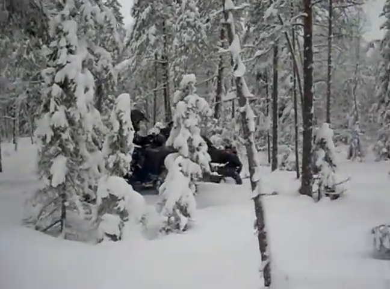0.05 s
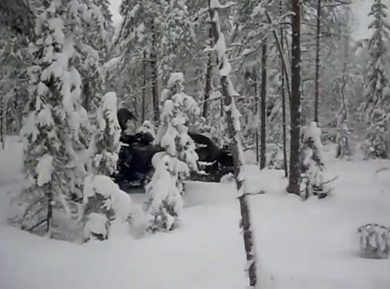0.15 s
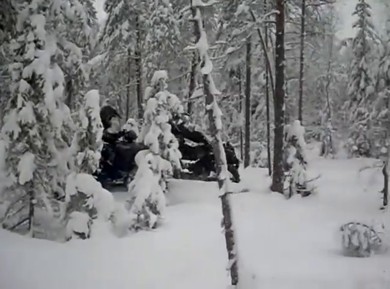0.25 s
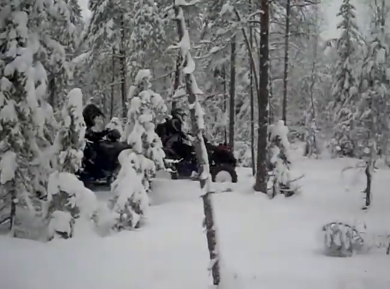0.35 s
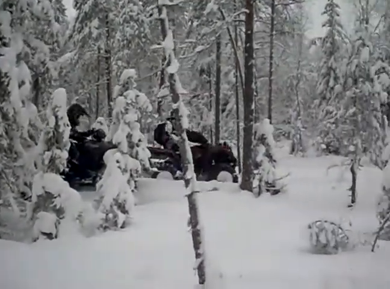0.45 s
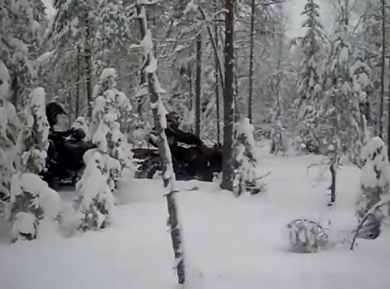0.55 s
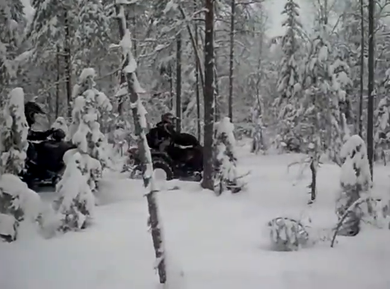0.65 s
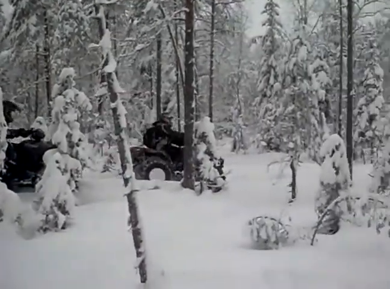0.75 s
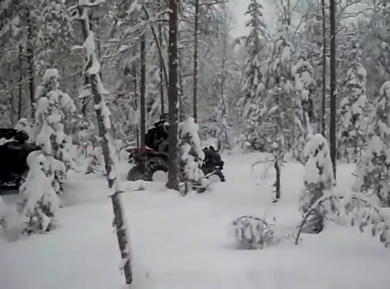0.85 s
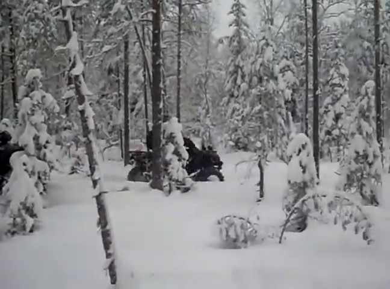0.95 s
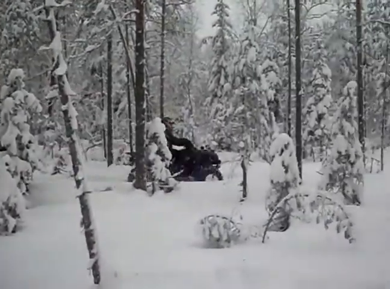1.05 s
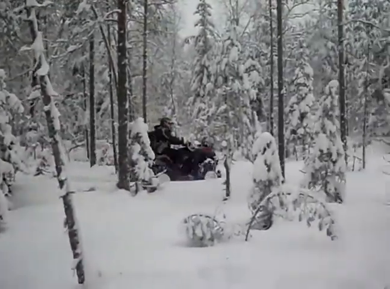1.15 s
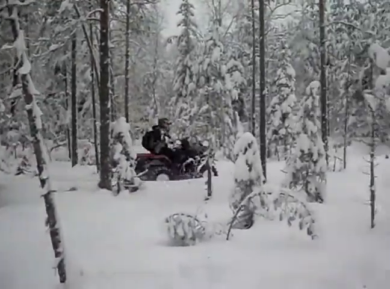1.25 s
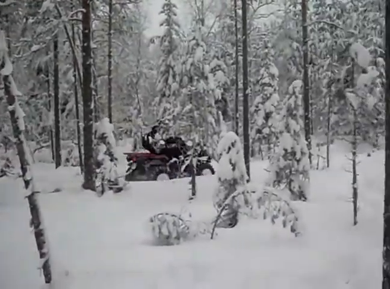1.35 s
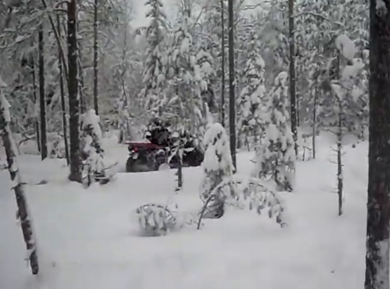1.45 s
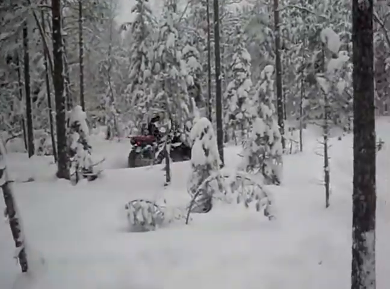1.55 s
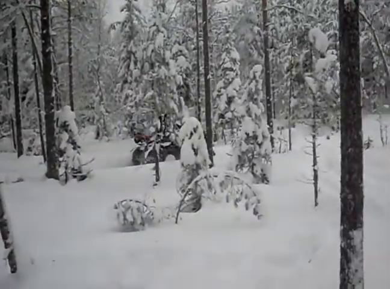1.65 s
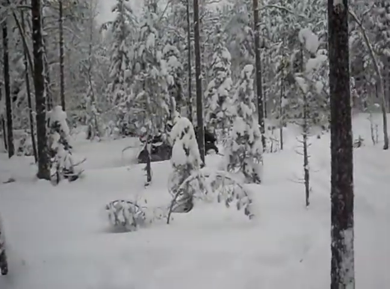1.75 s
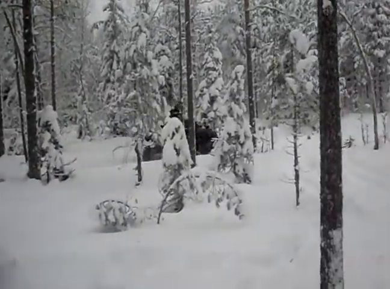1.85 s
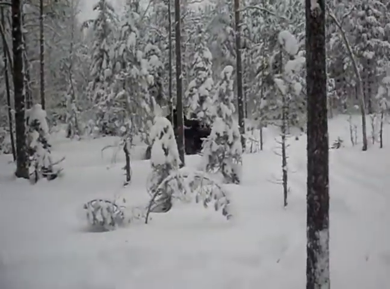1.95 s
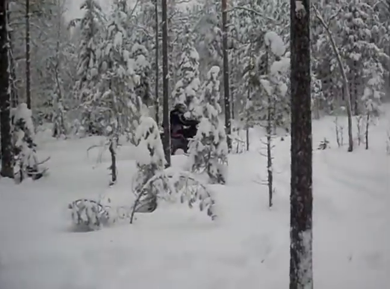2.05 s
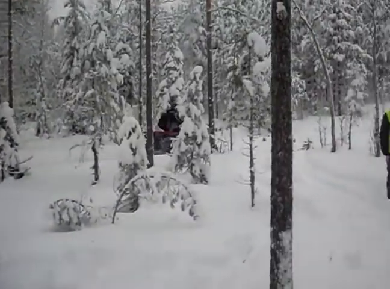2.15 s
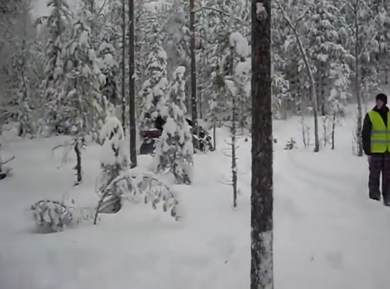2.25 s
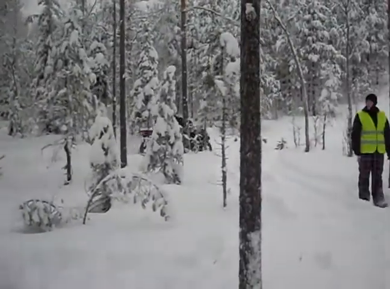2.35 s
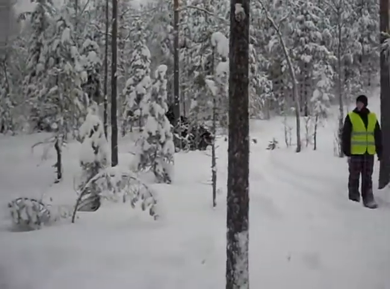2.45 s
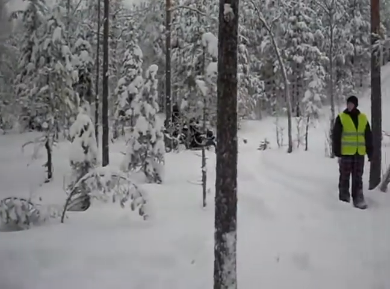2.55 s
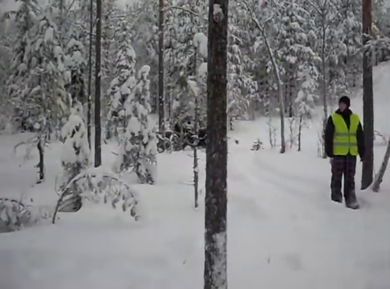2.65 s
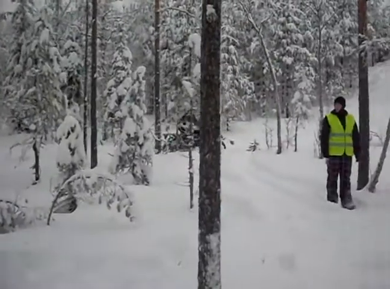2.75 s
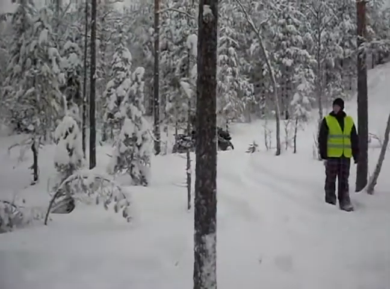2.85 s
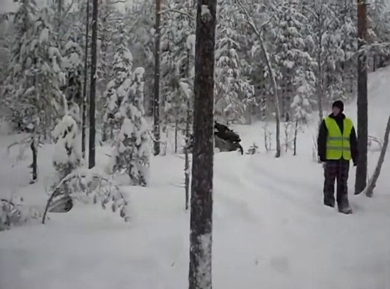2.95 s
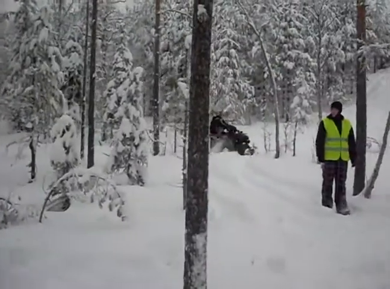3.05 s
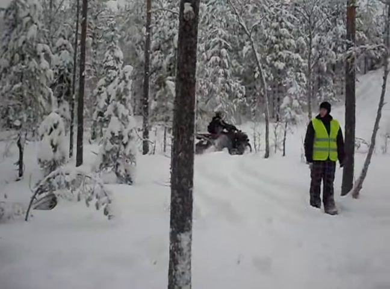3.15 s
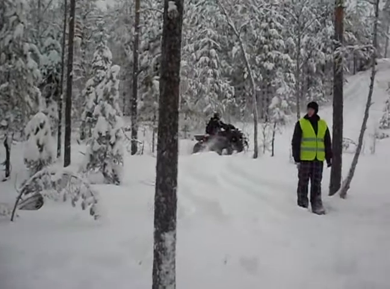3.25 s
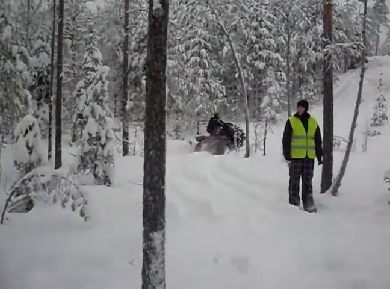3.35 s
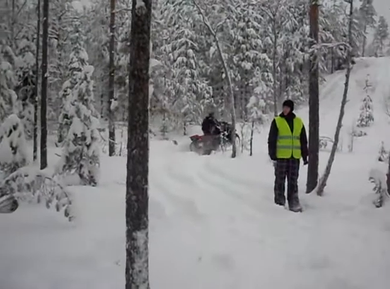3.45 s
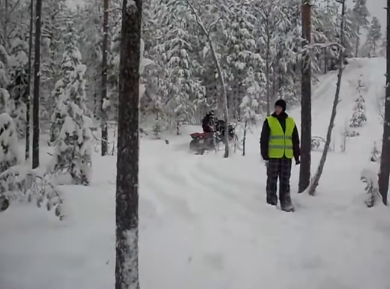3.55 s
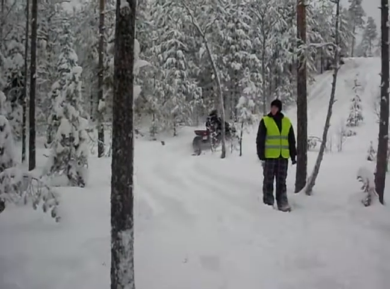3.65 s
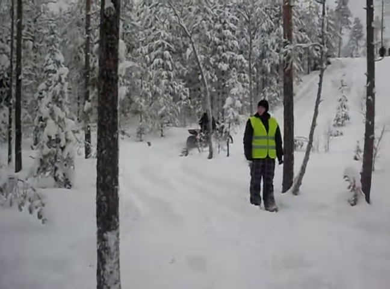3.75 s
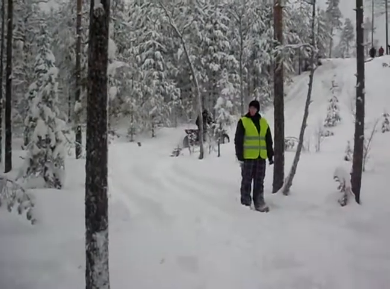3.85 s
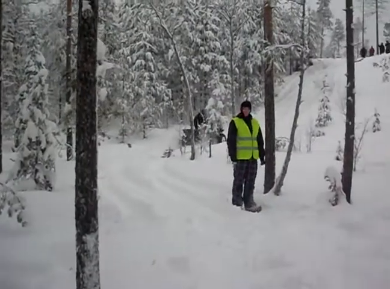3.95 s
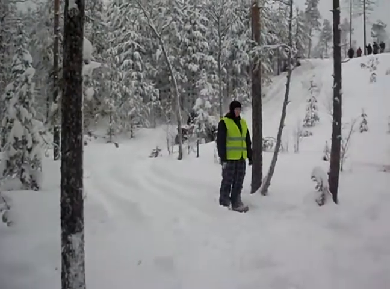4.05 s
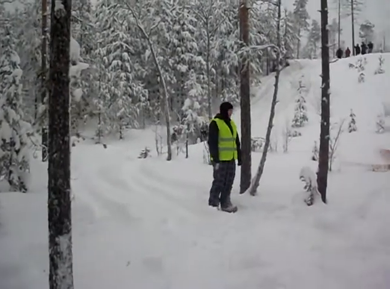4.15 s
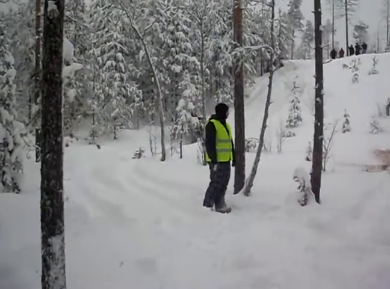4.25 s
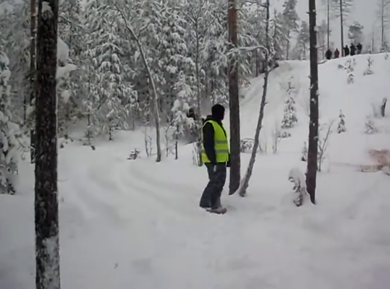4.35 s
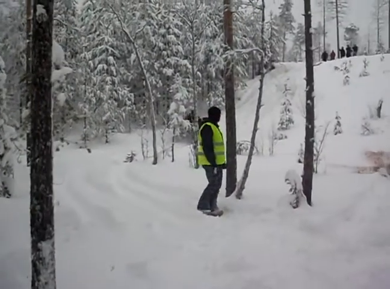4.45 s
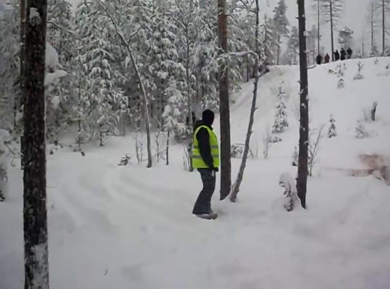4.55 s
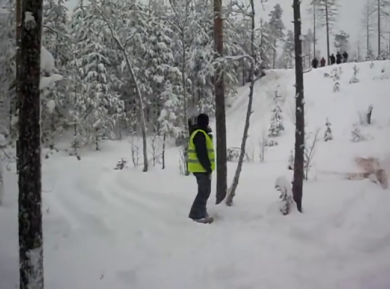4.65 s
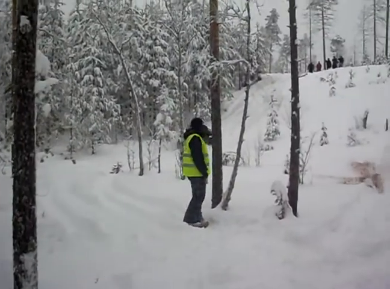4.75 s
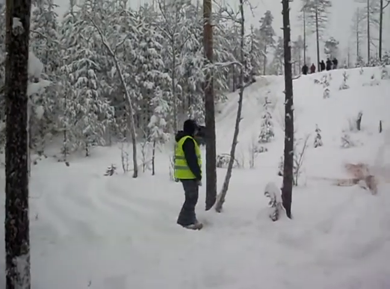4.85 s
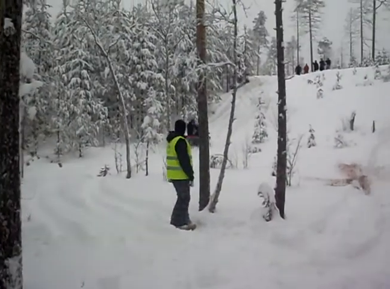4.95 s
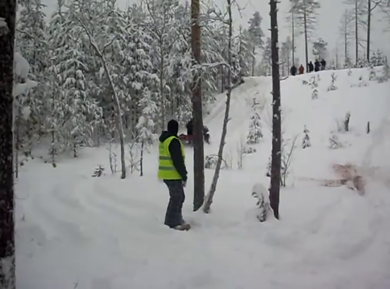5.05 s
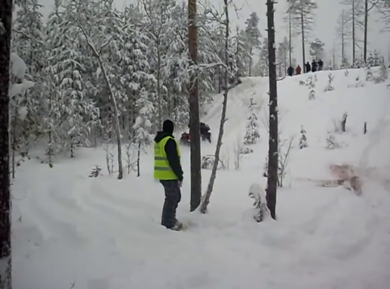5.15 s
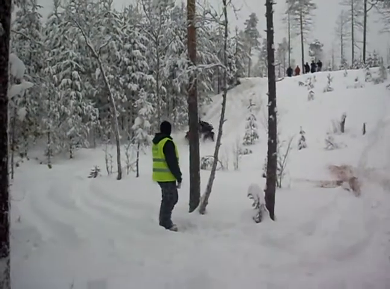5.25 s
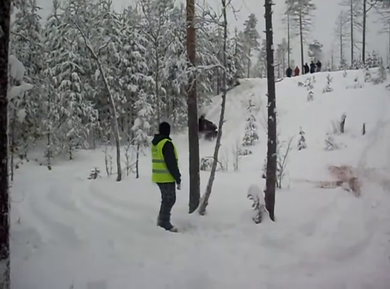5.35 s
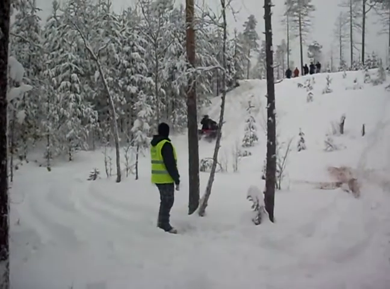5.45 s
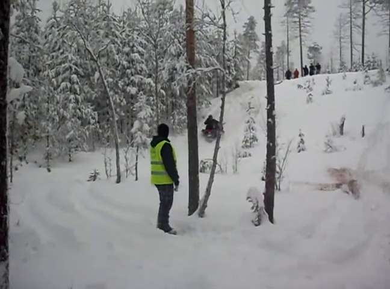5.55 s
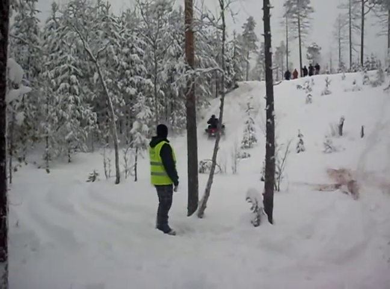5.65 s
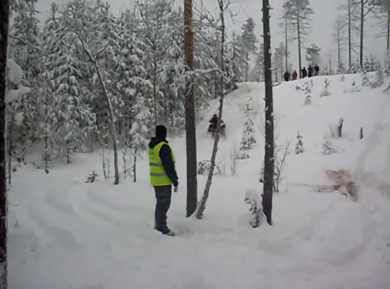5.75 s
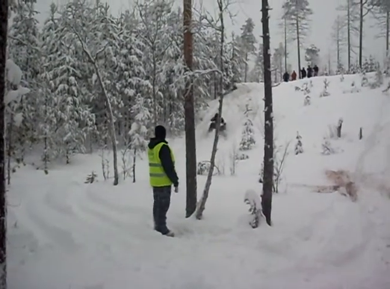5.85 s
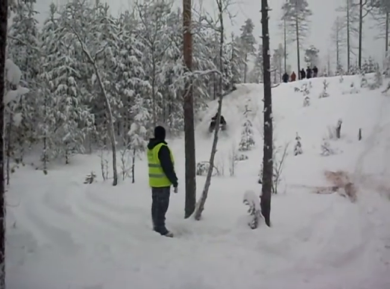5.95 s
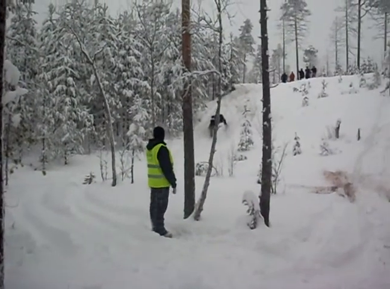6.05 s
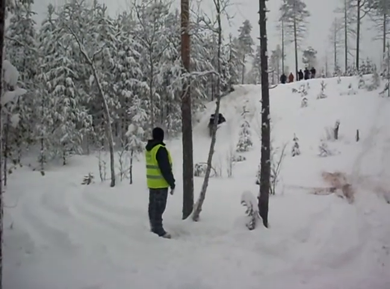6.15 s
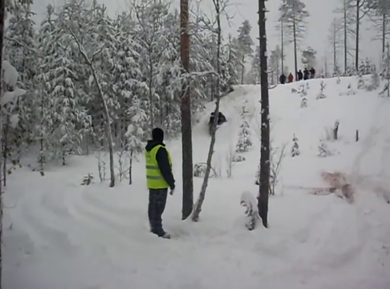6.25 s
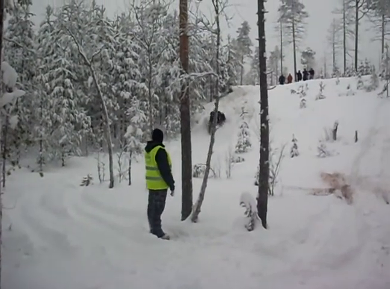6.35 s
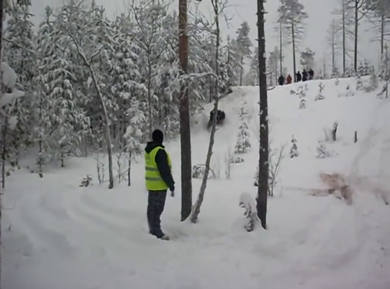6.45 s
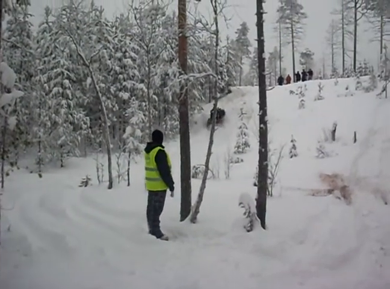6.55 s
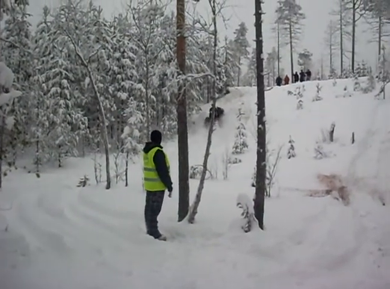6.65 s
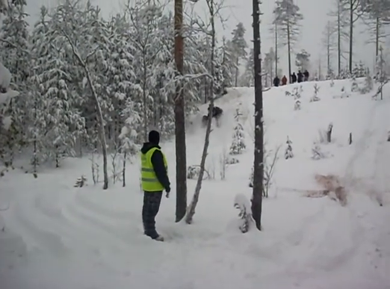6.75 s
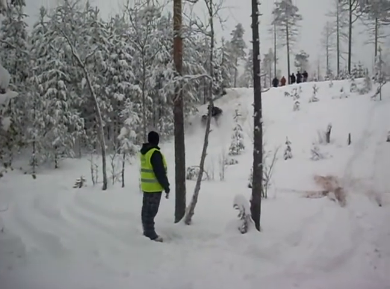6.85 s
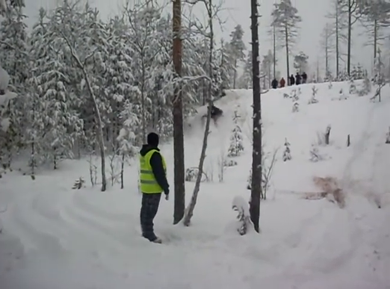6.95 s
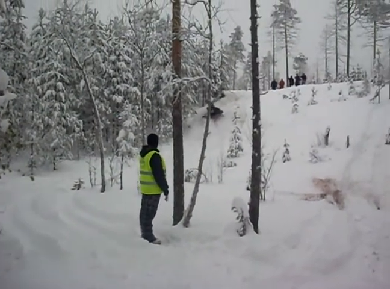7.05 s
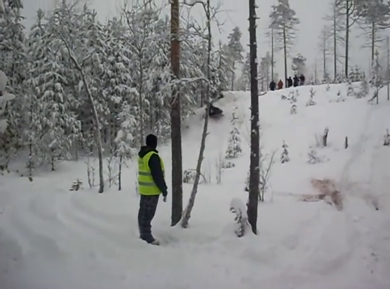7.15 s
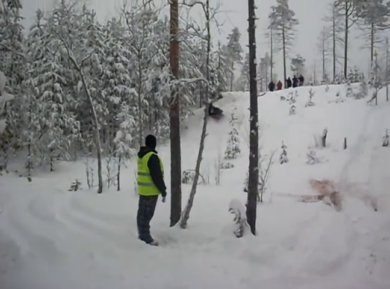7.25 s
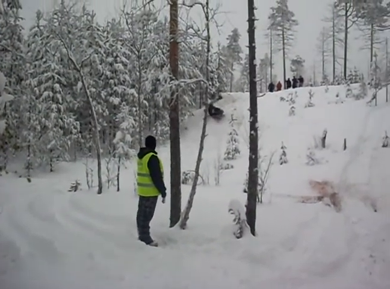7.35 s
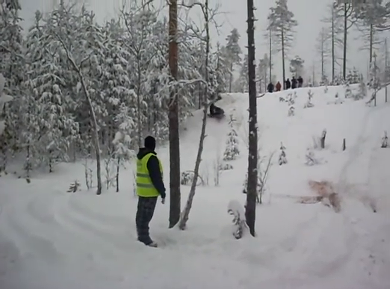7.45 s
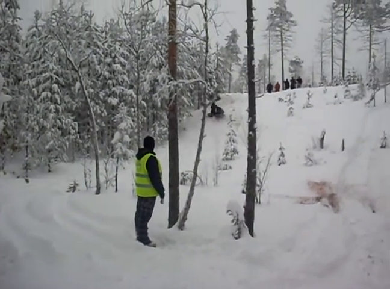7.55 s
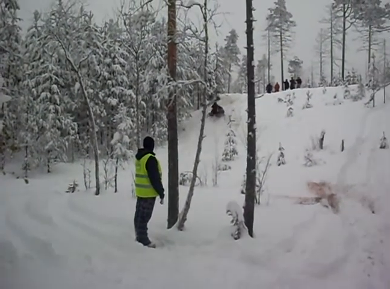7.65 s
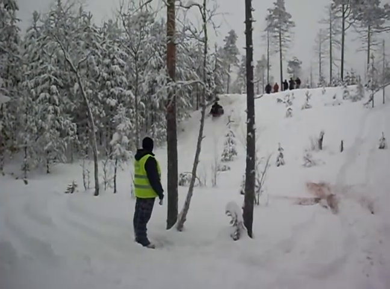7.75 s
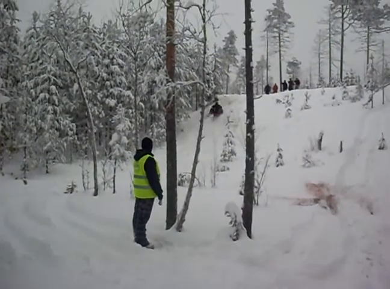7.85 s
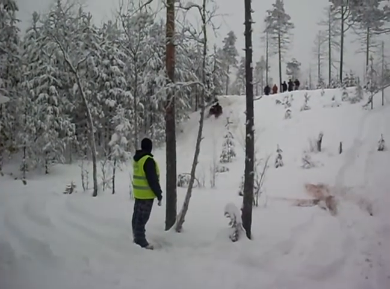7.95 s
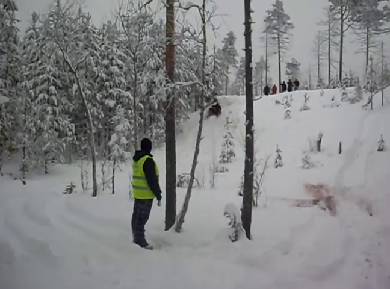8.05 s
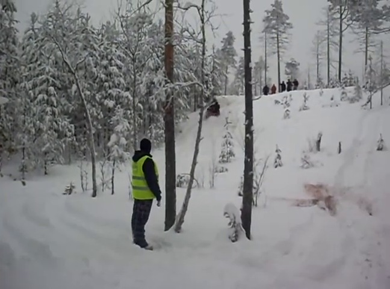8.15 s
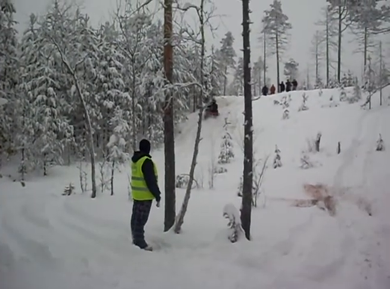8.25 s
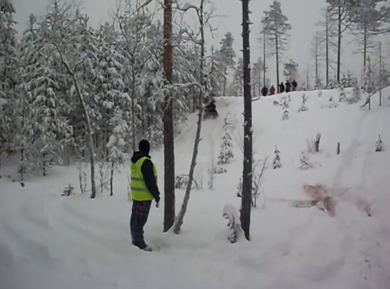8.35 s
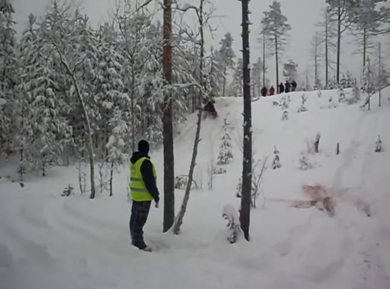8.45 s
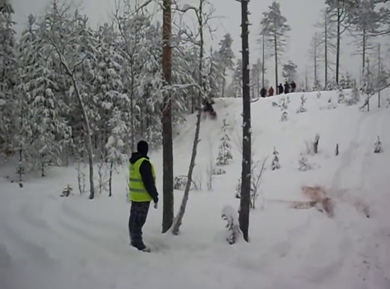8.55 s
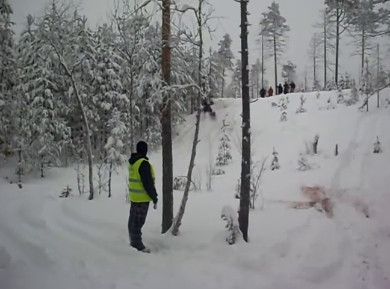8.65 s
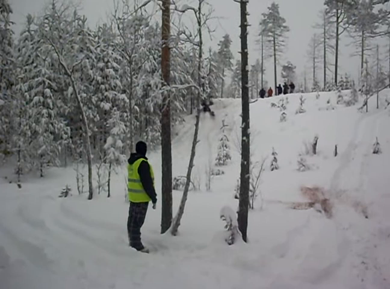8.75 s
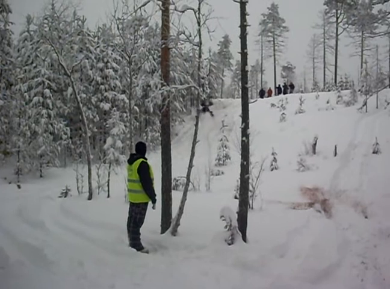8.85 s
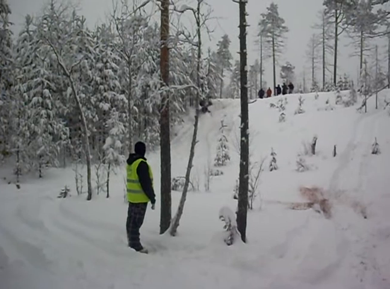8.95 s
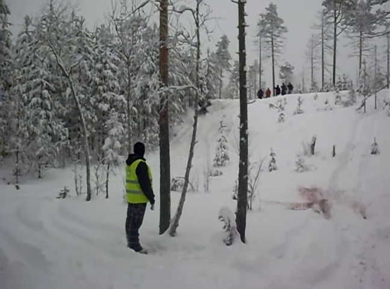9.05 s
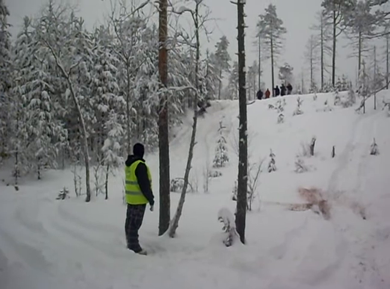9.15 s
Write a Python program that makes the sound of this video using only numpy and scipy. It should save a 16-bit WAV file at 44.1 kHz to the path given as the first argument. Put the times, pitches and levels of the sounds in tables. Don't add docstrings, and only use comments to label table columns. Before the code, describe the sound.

Outdoors in a snowy forest, a quad bike passes at part throttle, low and muffled behind trees, with distant engines rumbling beyond. It labours in deep snow, then about halfway through the throttle snaps open and the exhaust becomes a loud, rough, sustained bark with rasp and small cracks until the end. A small camera microphone gives a dull top end and a short soft echo off the trees.

```python
import sys
import numpy as np
from scipy import signal
from scipy.fft import rfft, irfft, next_fast_len
from scipy.io import wavfile
from scipy.ndimage import uniform_filter1d, map_coordinates

SR = 44100
rng = np.random.default_rng(int(sys.argv[2]) if len(sys.argv) > 2 else 0)


def pcm_store(signal):
    levels = np.round(np.clip(np.atleast_2d(signal), -1, 1) * 32767)
    wavfile.write(sys.argv[1], SR, levels.astype(np.int16).T)


def amplitude_ratio(level_db):
    exponent = np.asarray(level_db, float) / 20
    return 10 ** exponent


N = 406150


def unit(x):
    return x / np.sqrt(np.mean(x ** 2) + 1e-20)


def steady(x):
    power = uniform_filter1d(uniform_filter1d(x ** 2, size=4000), size=4000)
    return x / np.sqrt(np.abs(power) + 1e-20)


def seconds():
    return np.arange(N) / SR


def along(points, hz):
    f, v = np.transpose(points)
    return np.interp(np.log(hz + 1), np.log(f + 1), v)


def curves(rows, s=None):
    t, *columns = np.transpose(rows)
    at = seconds() if s is None else s
    return [np.interp(at, t, column) for column in columns]


def humps(when, size, width_s, s):
    return sum(a * np.exp(-.5 * ((s - t) / width_s) ** 2) for t, a in zip(when, size))


def filtered(x, response):
    m = next_fast_len(N + SR // 2)
    return irfft(rfft(x, m) * response(np.fft.rfftfreq(m, 1 / SR)), m)[:N]


def resonance(f, centre_hz, width_hz):
    return 1j * f * width_hz / (centre_hz ** 2 - f * f + 1j * f * width_hz)


def causal(spectrum):
    def response(hz):
        cepstrum = irfft(np.log(np.maximum(amplitude_ratio(along(spectrum, hz)), 1e-6)))
        half = len(cepstrum) // 2
        cepstrum[1:half] *= 2
        cepstrum[half + 1:] = 0
        return np.exp(rfft(cepstrum))
    return response


def pulses(s, size):
    keep = (s >= 0) & (s < (N - 1) / SR)
    return np.bincount(np.round(s[keep] * SR).astype(int), size[keep], N)


def bursts(s, size, decay_s):
    envelope = signal.lfilter([1], [1, -np.exp(-1 / (decay_s * SR))], pulses(s, size))
    return envelope * rng.standard_normal(N)


# (frequency [Hz], level [dB per Hz])
DISTANT = [(15, -36), (25, -16.5), (102, 0), (253, -8.5), (328, -10.5), (383, -8), (581, -8), (645, -9.5),
           (836, -4.5), (2250, -10), (3500, -16.5), (9890, -28.5), (12500, -37), (16200, -85),
           (22000, -120)]


def distant():
    swell_db = map_coordinates(rng.standard_normal(40), [np.arange(N) * 3 / SR])
    noise = filtered(rng.standard_normal(N), lambda f: amplitude_ratio(along(DISTANT, f)))
    return amplitude_ratio(-43.5 + swell_db) * unit(noise)


# (frequency [Hz], t60 [s])
TREES = [(200, 0.072), (1000, 1), (8000, 0.011)]


def trees(x):
    out, step = np.zeros(N + SR), SR // 4
    for start in range(-step, N, step):
        hz, t, z = signal.stft(rng.standard_normal(SR // 3), SR, nperseg=256)
        decay = amplitude_ratio(-60 * t / along(TREES, hz)[:, None])
        tail = signal.istft(z * decay, SR, nperseg=256)[1]
        at = np.arange(max(start, 0), min(start + 2 * step, N))
        fade = np.sin(np.pi * (at - start) / (2 * step)) ** 2
        echo = signal.fftconvolve(x[at] * fade, tail / np.linalg.norm(tail))
        out[at[0]:at[0] + len(echo)] += echo
    return out[:N]


# (time [s], first notch [Hz], share [0-1])
BOUNCE = [(0, 1190, 0), (.6, 1300, 0), (4.4, 5260, 0.12), (4.9, 4700, 0.5), (5.3, 4300, 0.76),
          (5.5, 3000, 0.49), (6, 2270, 0.02), (6.6, 2040, 0.6), (7, 1580, 0.44), (7.6, 1360, 0.3),
          (8.6, 1060, 0.34), (9.21, 1130, 0.22)]


def snow(x, gain=1):
    notch_hz, share = curves(BOUNCE)
    dull = filtered(x, lambda f: 1 / (1 + (f / 5200) ** 4))
    bounce = np.interp(np.arange(N) - SR / notch_hz, np.arange(N), dull)
    return steady(x - np.clip(gain * share, 0, 1) * bounce)


# (time [s], throttle [0-1], load of deep snow [0-1])
RIDING = [
    (0, 0, 0),
    (2, 0, 0),
    (3, 0, .9),
    (4.38, .1, 1),
    (4.44, .6, 1),
    (4.7, .9, 1),
    (5, 1, 1),
]
# (rear over front [dB], front pipe echo [0-1], silencer echo [0-1], roughness [0-1])
ROLLING = (-2, .68, .5, .09)
DIGGING = (-.5, .83, .2, .15)
FLAT_OUT = (6, .46, .07, .1)


def riding(s=None):
    throttle, load = curves(RIDING, s)
    mix = []
    for rolling, digging, flat_out, power in zip(ROLLING, DIGGING, FLAT_OUT, (3, 1, 1, 1)):
        opened = throttle ** power
        mix.append((1 - opened) * (rolling + load * (digging - rolling)) + opened * flat_out)
    return [throttle] + mix


# (time [s], rate [firing pairs/s])
SPEED = [(0.0, 39.14), (0.12, 41.22), (0.55, 42.82), (0.8, 39.45), (1.1, 41.76), (1.6, 39.55), (2.3, 39.85),
         (2.75, 42.05), (3.5, 42.72), (4.38, 44.15), (4.78, 56.92), (5.7, 56.37), (6.4, 55.48),
         (6.95, 57.13), (7.8, 55.18), (8.5, 55.41), (9.21, 55.04)]
# (time [s], change [firing pairs/s])
RUTS = [(0.26, -1.25), (0.43, -1.21), (1.12, -1.13), (3.05, -1.19), (3.41, 1.48), (3.67, 1.72),
        (3.76, -1.53), (3.91, -2.1), (4.23, -2.03), (4.92, -1.8), (5.08, -1.32), (5.36, -1.28),
        (5.45, -0.99), (5.56, 0.7), (5.65, 1.81), (5.76, 1.14), (5.85, -1.41), (6.38, -1.12), (6.59, -1.74),
        (7.13, -2.03), (7.22, -1.71), (7.42, 1.66), (7.84, -2.41), (8.31, -1.18), (8.45, 1.48),
        (8.53, -2.3), (8.59, -3.86), (8.65, -2.68), (8.95, -1.75), (9.05, -2.04)]
RUT_S = .03
CLUTCH_S, FLARE_S, FLARE_HZ = 4.53, .04, 1.3


def speed():
    t = seconds()
    clutch = humps([CLUTCH_S - FLARE_S, CLUTCH_S + FLARE_S], [FLARE_HZ, -FLARE_HZ], RUT_S, t)
    return curves(SPEED)[0] + humps(*np.transpose(RUTS), RUT_S, t) + clutch


def turns():
    return np.cumsum(speed()) / SR - .52


PITCHING_S, PITCHING_RATE = .00012, 16
EARLY, EARLY_LOAD, EARLY_THROTTLE = .317, .015, .023
SNAP_S, SNAP_LASTS_S, SNAP_DB = 4.9, 0.045, -2


def firings():
    pairs = turns()
    rear = np.interp(np.arange(int(pairs[-1]) + 1), pairs, seconds()) - .0003
    rocking = map_coordinates(rng.standard_normal(200), [np.abs(rear) * PITCHING_RATE])
    rear = rear + PITCHING_S * rocking
    throttle, lead_db = riding(rear)[:2]
    lead_db = lead_db + humps([SNAP_S], [SNAP_DB], SNAP_LASTS_S, rear)
    load = curves(RIDING, rear)[1]
    early = EARLY - EARLY_THROTTLE * throttle - EARLY_LOAD * (1 - throttle) * load
    front = rear - early / np.interp(rear, seconds(), speed())
    chance = rng.standard_normal((2 * len(rear), 2))
    s = np.r_[front, rear] + .00004 * chance[:, 0]
    size = amplitude_ratio(np.r_[-lead_db / 2, lead_db / 2] + .8 * chance[:, 1])
    return s, size, np.repeat([0, 1], len(rear))


def blowdown(s, size, rear):
    pipe, silencer = riding(s)[2:4]
    if rear:
        pipe = .2 * pipe
    else:
        silencer = 0.15 * silencer
    scatter = rng.standard_normal((len(s), 2))
    train = pulses(s, size)
    train = train + pulses(s + 0.001764 + .00005 * scatter[:, 0], size * pipe)
    train = train + pulses(s + 0.00303, size * 0.64 * pipe ** 2)
    train = train + pulses(s + 0.00491 + .00008 * scatter[:, 1], size * silencer)
    train = train + pulses(s + 0.0075 + 0.00027 * scatter[:, 0], size * 0.76 * silencer)
    return -train


# (multiple of the pair rate, level [dB])
CRUISE = [(1, -26), (2, -5.5), (3, -39), (4, -9.5), (5, -9.5), (6, 3), (7, -19)]
DIG = [(1, -1), (2, -3.5), (3, 7), (4, 1.5), (5, -7.5), (6, -8.5), (7, -4)]
FLAT = [(1, -7), (2, -6.5), (3, -2.5), (4, 4.5), (5, -1.5)]
# (time [s], cruising [0-1], digging [0-1], flat out [0-1])
GAIT = [
    (0, 1, 0.9, 0.8),
    (.7, 1, 0.45, 0),
    (2.4, 1, 0.05, 0),
    (3.2, 0.43, 0.9, 0),
    (4.35, 0, 1, 0.15),
    (4.6, 0, 1, 1),
    (9.21, 0, 0.76, 1),
]


def thump():
    pairs, out = turns(), np.zeros(N)
    for share, orders in zip(np.clip(curves(GAIT), 0, 1), (CRUISE, DIG, FLAT)):
        for k, db in orders:
            drift = map_coordinates(rng.standard_normal(60), [np.arange(N) * 5 / SR], order=1)
            tone = np.sin(2 * np.pi * k * (pairs - .05) + 0.075 * k * k)
            out = out + share * amplitude_ratio(db + 3.2 * drift) * tone
    return steady(out)


# (centre [Hz], width [Hz])
PART = [
    [(710, 590), (553, 1800)],
    [(485, 390), (356, 6300)],
]
# (centre [Hz], width [Hz])
FULL = [(640, 634), (800, 900)]
SIDE_S, SIDE_LASTS_S, SIDE_SHARE, SIDE_HZ = 1.36, 0.49, 0.47, 1000


def bark(trains, s, size):
    throttle, *_, rough = riding()
    puff = np.sqrt(.18 * rough * np.abs(uniform_filter1d(sum(trains) ** 2, size=4000)))
    front = trains[0] + puff * steady(bursts(s, size, decay_s=0.017))
    rear = trains[1]

    def ring(x, a, b):
        return filtered(x, lambda f: resonance(f, 448, 905) * resonance(f, *a) * resonance(f, *b))

    part = ring(front, *PART[0]) + 1.3 * ring(rear, *PART[1])
    part = part + 0.34 * filtered(part, lambda f: resonance(f, 667, 140))
    header = steady(ring(front, (SIDE_HZ, 500), (SIDE_HZ, 900)))
    part = steady(part) + humps([SIDE_S], [SIDE_SHARE], SIDE_LASTS_S, seconds()) * header
    hidden = np.interp(seconds(), [.35, .7], [.9, 0])
    screened = filtered(part, lambda f: 1.3 / (1 + (f / 720) ** 6))
    part = steady((1 - hidden) * part + hidden * screened)
    full = steady(ring(front + rear, *FULL))
    return snow((1 - throttle) * part + throttle * full)


# (centre [Hz], width [Hz], level [dB])
SHELL = [(1130, 740, 19), (1603, 810, 16.5), (2323, 150, 9.5), (3170, 180, -3), (3720, 500, -39),
         (3000, 9400, 5.5)]
PIPE_ECHO_S, PIPE_ECHO = .00174, .4
RASP_BOUNCES, EDGE_SHARE = 1.3, .35


def rasp(train, s, size):
    puff = steady(bursts(s, np.sqrt(size), decay_s=0.0028))
    source = EDGE_SHARE * steady(train) + puff

    def metal(f):
        shell = sum((-1) ** k * amplitude_ratio(db) * resonance(f, c, w) for k, (c, w, db) in enumerate(SHELL))
        echo = 1 + PIPE_ECHO * np.exp(-2j * np.pi * f * PIPE_ECHO_S)
        return echo * shell * resonance(f, 2500, 1180)

    return snow(filtered(source, metal), RASP_BOUNCES)


# (frequency [Hz], level [dB per Hz])
HISS = [(2000, -6), (3500, 6), (5000, 0.5), (7000, -1.5), (9000, -2.5), (11000, 0), (13000, -5.5)]
SPITE_DB, SPITE_SHARE = 4, .32


def hiss(s, size):
    spite = amplitude_ratio(SPITE_DB * rng.exponential(size=len(s)))
    jet = steady(bursts(s, size, decay_s=0.0074))
    jet = jet + SPITE_SHARE * unit(bursts(s, size * spite, decay_s=0.0012))
    return snow(filtered(jet, lambda f: amplitude_ratio(along(HISS, f))), RASP_BOUNCES)


# (time [s], peak level [dB])
CRACKS = [(2.8575, -36), (3.9141, -33), (3.9595, -36), (4.7247, -34), (4.8295, -26), (4.9557, -31),
          (5.1992, -30), (6.1226, -33), (6.1465, -28), (6.3071, -29), (6.344, -28), (6.3994, -28),
          (6.5007, -29), (6.574, -29), (6.8474, -32), (7.0933, -29), (7.4151, -20), (7.6291, -30),
          (7.7379, -32), (7.8611, -28), (8.3385, -31), (8.7122, -35), (8.8923, -34), (8.9845, -30),
          (9.1696, -29)]


def cracks(s):
    when, db = np.transpose(CRACKS)
    nearest = s[np.argmin(np.abs(s - when[:, None]), axis=1)]
    shocks = bursts(nearest, amplitude_ratio(db + 7), decay_s=0.00066)
    return filtered(shocks, lambda f: resonance(f, 8400, 14000))


# (time [s], level [dB], clear view of the pipe mouth [dB])
EXHAUST = [(0, -38, -12), (.5, -37.5, -3), (.65, -39, 0), (1.02, -33.5, -7.5), (1.3, -36.5, -2.5),
           (2.3, -38.5, -3.5), (3.87, -40, 3), (4.38, -36, 0.5), (4.45, -28.5, 6.5), (4.75, -23, 0),
           (5.13, -23.5, 1.5), (5.5, -21, -0.5), (6.2, -23.5, -5.5), (6.6, -21.5, -2.5), (6.95, -19, -5),
           (7.44, -20, -5), (8.2, -23.5, -5.5), (9.21, -24, -6)]
# (time [s], rasp [dB], hiss [dB])
GAPS = [(1.08, -3, 4.5), (1.64, 3, 4), (2.05, 2, 2), (2.28, 4, -4), (2.41, -19, 5), (4.0, 7.5, 3.5),
        (4.13, 8, 0), (4.25, 1, -4), (4.46, 1.5, 3.5), (4.93, 3.5, 0.5), (5.13, -1.5, -7),
        (5.36, -2.5, 0.5), (5.59, 1.5, 1.5), (6.1, -3, -4), (6.16, 7, 2), (6.28, 5, -5), (6.67, 3.5, 1),
        (7.41, 3, -2), (8.18, -5, -3), (8.95, 5, -11), (9.11, 7, -11)]
GAP_S = 0.041
RASP_DB, HISS_DB, HISS_FOLLOWS, HISS_DULLS_DB = -11, -12.5, 0.87, -7
THUMP_DB, THUMP_FOLLOWS, THUMP_GAINS_DB = -6, 0.81, -13.5


def quad():
    s, size, rear = firings()
    trains = [blowdown(s[rear == k], size[rear == k], k) for k in range(2)]
    bark_db, view_db = curves(EXHAUST)
    throttle = riding()[0]
    when, *gap_db = np.transpose(GAPS)
    rasp_gap, hiss_gap = [humps(when, db, GAP_S, seconds()) for db in gap_db]
    usual_db = -38 + 15 * throttle
    thump_db = usual_db + THUMP_FOLLOWS * (bark_db - usual_db) + THUMP_DB + THUMP_GAINS_DB * throttle
    rasp_db = bark_db + RASP_DB + view_db + rasp_gap
    hiss_db = bark_db + HISS_DB + HISS_FOLLOWS * view_db + HISS_DULLS_DB * throttle + hiss_gap
    note = amplitude_ratio(bark_db) * bark(trains, s, size)
    note = note + amplitude_ratio(thump_db) * thump()
    note = note + amplitude_ratio(rasp_db) * rasp(sum(trains), s, size)
    note = note + amplitude_ratio(hiss_db) * hiss(s, size)
    return note + cracks(s)


def scene():
    machine = quad()
    near_db = [-3.5, -2, 1, -2, 0.5, 1.0]
    near = np.interp(seconds(), [0, .15, .6, 4.3, 4.6, 9.21], amplitude_ratio(near_db))
    return (machine + amplitude_ratio(-21) * trees(machine) + near * distant())[None]


# (frequency [Hz], level [dB])
MIC = [(20, 5.5), (1950, -1), (2300, 4), (2700, -1.5), (10000, -1), (11000, -8.5), (12000, -21),
       (12800, -38), (16000, -35)]


def microphone(dry):
    return filtered(dry[0], causal(MIC))[None]


def top_cut(x):
    return signal.sosfilt(signal.butter(12, 12650, fs=SR, output="sos"), x)


def record(dry):
    mix = microphone(dry)
    return top_cut(mix)


dry = scene()
out = record(dry)
pcm_store(out)
```